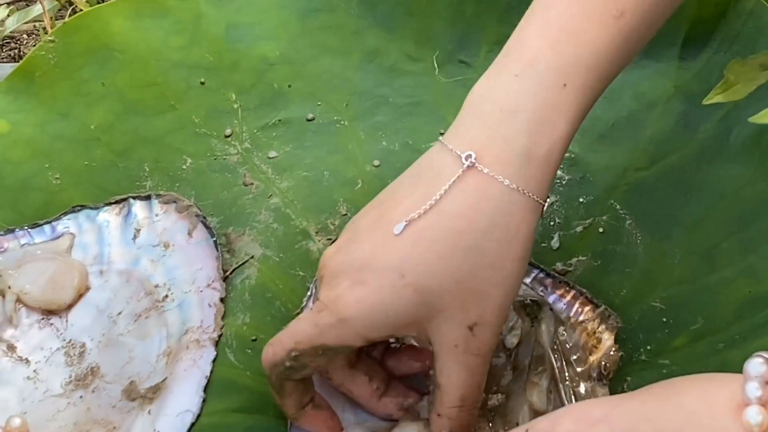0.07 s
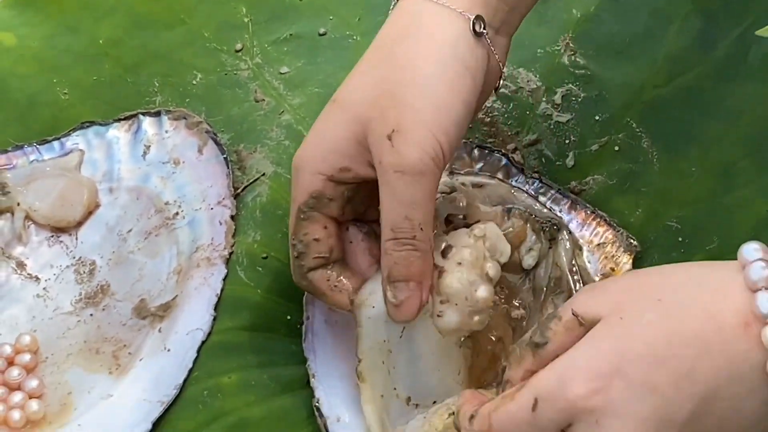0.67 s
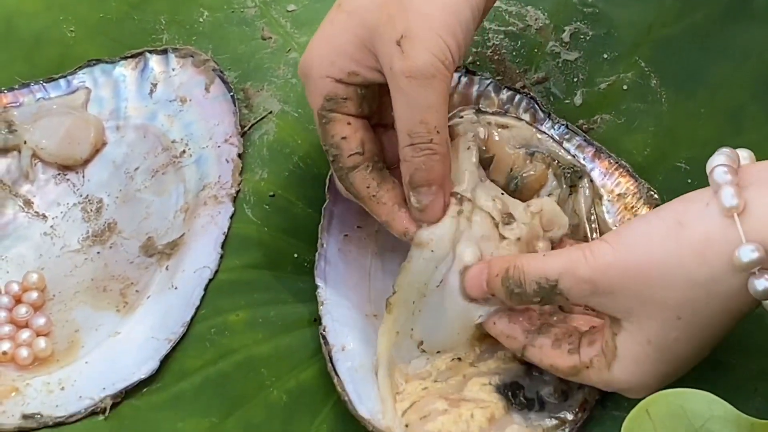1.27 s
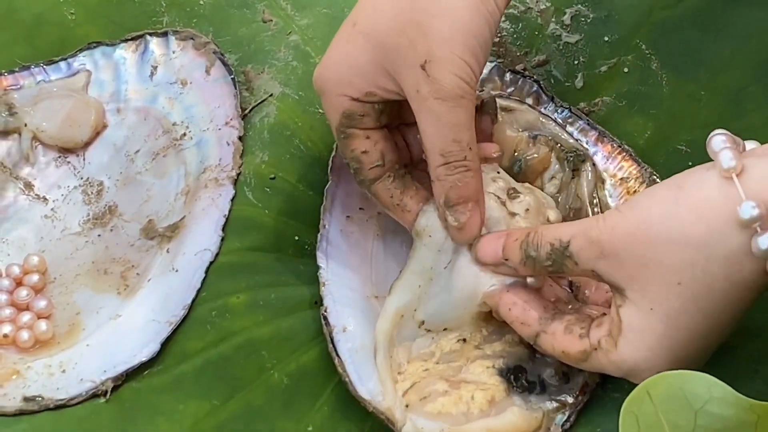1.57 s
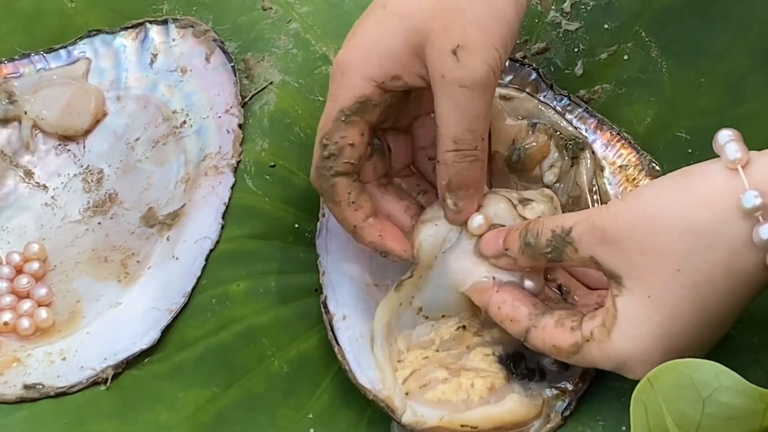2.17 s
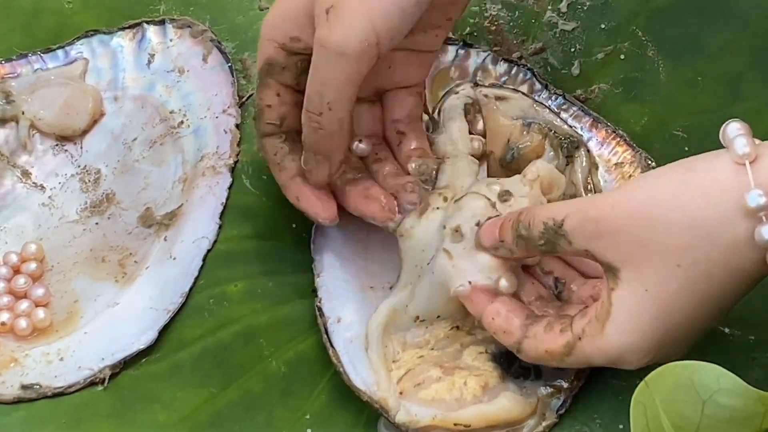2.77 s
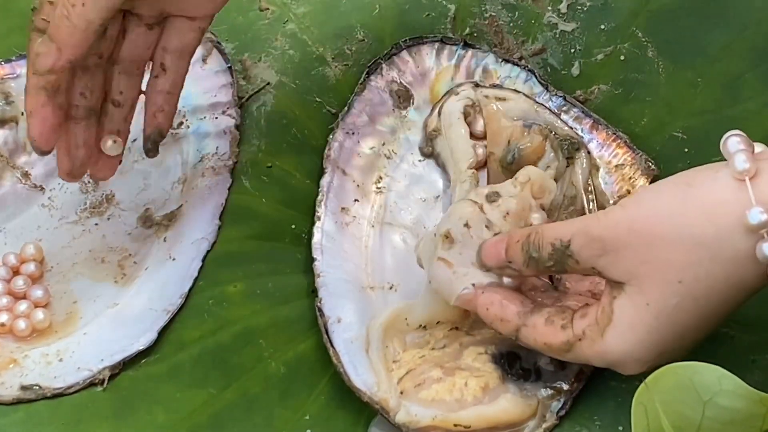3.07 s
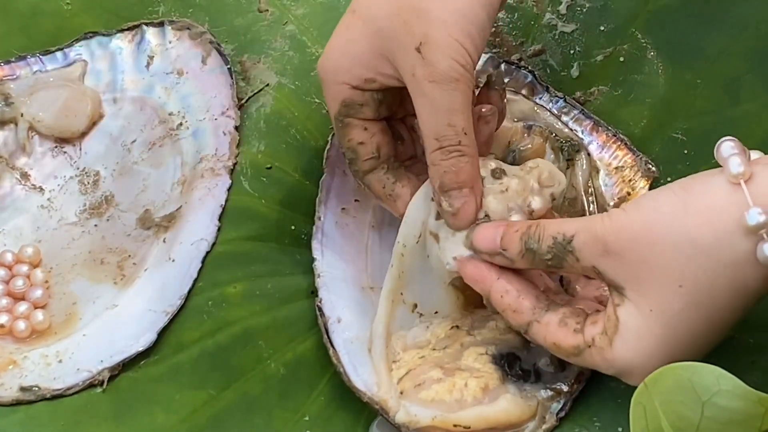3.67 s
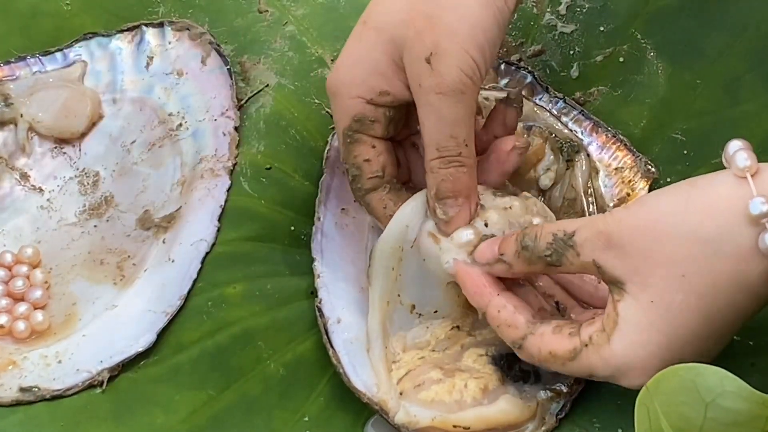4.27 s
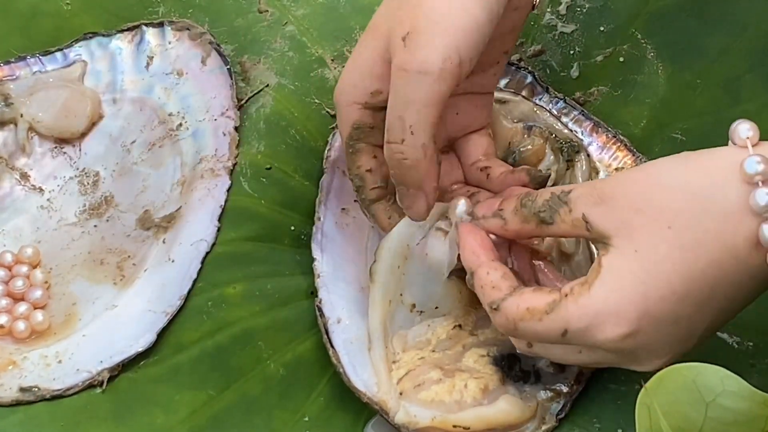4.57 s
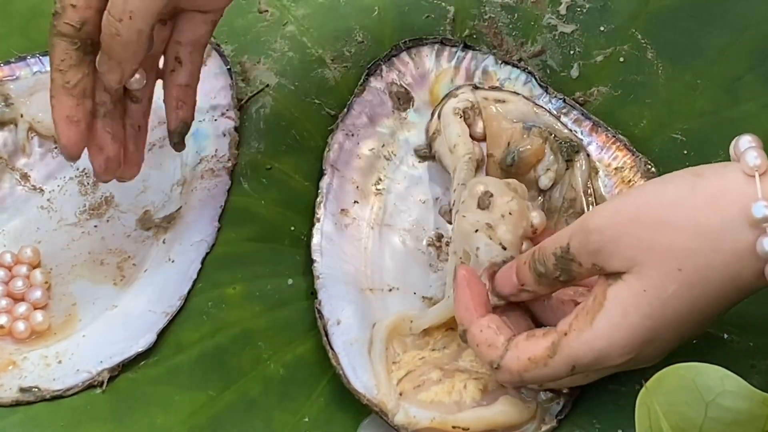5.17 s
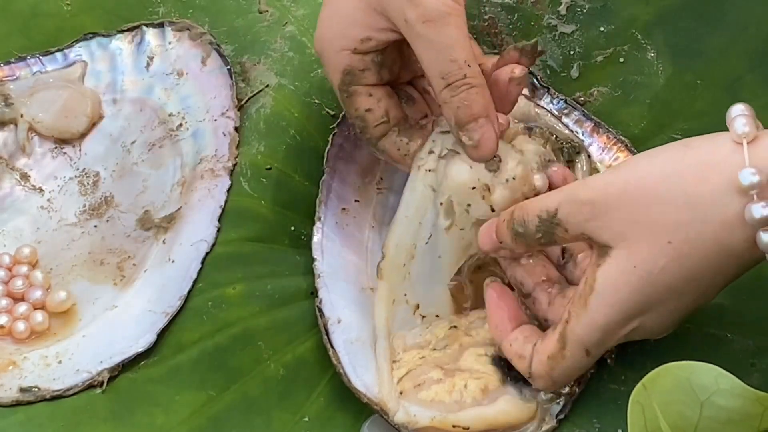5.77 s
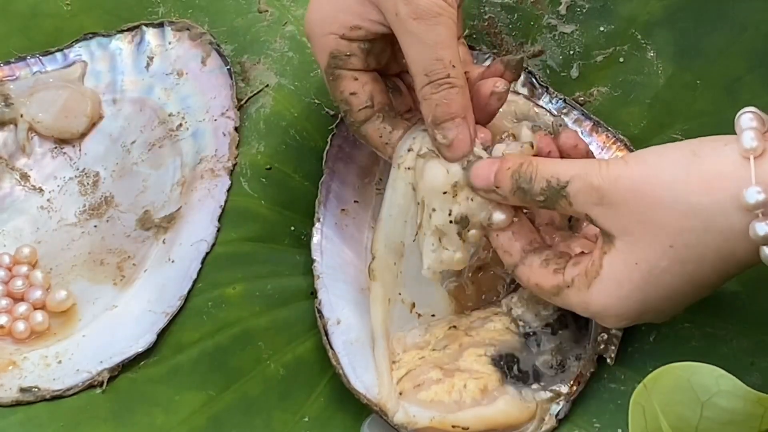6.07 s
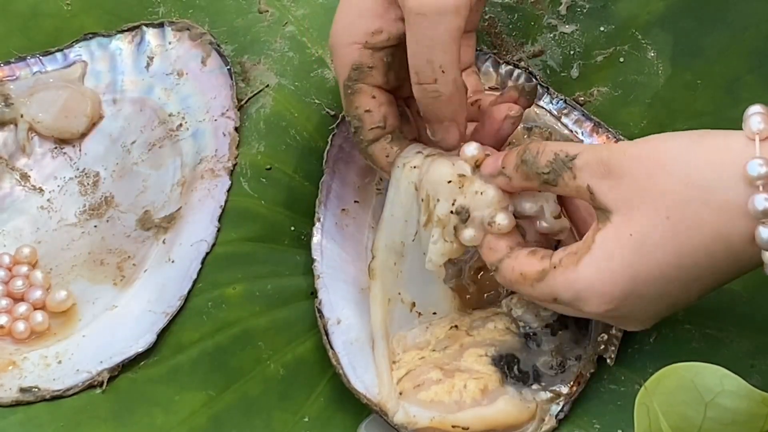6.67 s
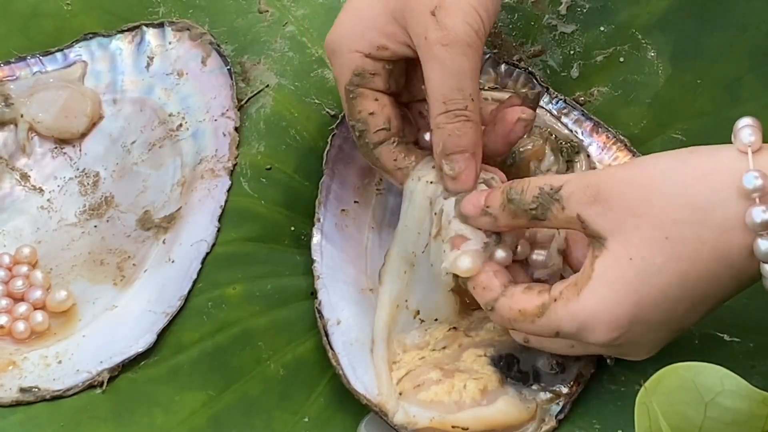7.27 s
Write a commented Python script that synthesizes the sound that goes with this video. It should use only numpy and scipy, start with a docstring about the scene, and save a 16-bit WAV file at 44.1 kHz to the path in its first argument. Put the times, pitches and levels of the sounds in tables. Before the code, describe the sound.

Pearls drop twice into a shell with bright, bouncing clicks, between soft wet squelches of mussel flesh and distant bird chirps.

```python
"""Pearls drop twice into an empty half shell close to a stereo microphone, bouncing and setting it ringing.
Wet fingers work them out of an opened mussel: the flesh squelches softly, films of water smack,
bubbles squirt through its folds and the mussel bumps on its leaf. The spot is outdoors: farther off,
small birds chirp in the trees and a cricket scrapes its wings, over a low rumble and faint airy noise."""
import sys
import numpy as np
from scipy import signal
from scipy.fft import rfft, irfft, next_fast_len
from scipy.io import wavfile
from scipy.ndimage import uniform_filter1d

SR = 44100
rng = np.random.default_rng(int(sys.argv[2]) if len(sys.argv) > 2 else 0)


def int16_out(signal):
    """Quantize to a 16-bit WAV file."""
    q = np.round(np.clip(np.atleast_2d(signal).T, -1, 1) * 32767)
    wavfile.write(sys.argv[1], SR, q.astype(np.int16))


N = 331191
TIME = np.arange(N) / SR

# Pearls landing and bouncing: t/s, place (0-1, first spot to second), knock/dB, ring/dB, tick/dB
PEARL_STRIKES = [(3.1623, 0.4, -28, -25, -15.5), (3.2223, 0.74, -37, -27, -23),
                 (3.2461, 0.8, -48.5, -36, -32), (3.249, 0.34, -41, -33, -34), (3.255, 0.44, -63, -47, -44),
                 (3.2583, 0.5, -49, -44, -39), (3.27, 0.6, -51, -45.5, -54),
                 (5.2914, 1, -30.5, -24.5, -14.5), (5.352, 1, -38.5, -35.5, -28.5),
                 (5.366, 0.7, -42.5, -36, -27), (5.3854, 0.7, -55, -46, -46),
                 (5.443, 0.7, -41.5, -30, -35.5), (5.46, 0.5, -47, -36.5, -38),
                 (5.4845, 0.5, -51.5, -39, -44), (5.527, 0.7, -61, -55.5, -65),
                 (5.5645, 0.7, -61, -64, -45.5)]
# Ranges of the knock, ring and tick: low f/Hz, high f/Hz
STRIKE_RANGES = [(260, 3500), (3600, 8200), (8200, 16500)]
# Modes of the empty shell: f/Hz, level/dB struck at the first spot, level/dB at the second, t60/s
SHELL_MODES = [(881.4, -1, -16, 0.016), (1200, 3, -2, 0.005), (1700, 3.5, 4, 0.0037),
               (2180, 5, 0.5, 0.0075), (2590, 1.5, 1, 0.0043), (3060, -5, -10.5, .011),
               (4140, -3.5, -5, 0.013), (4470, -11.5, -4.5, .012), (5130, 6.5, 0.5, 0.014),
               (5746, 2.5, 8.5, 0.007), (6220, 6, 10.5, 0.0082), (6520, 4, 3, 0.012), (6960, 7.5, -1, .01),
               (7460, 8.5, 0, 0.011), (8330, 9, 8, .004), (9800, 4.5, 13, 0.005),
               (10760, 4.5, 10.5, 0.0047), (11460, 13, 7.5, 0.0056), (12970, 14, 8.5, 0.0033),
               (13860, 14, 10, .005), (14750, 9, 6.5, 0.0056), (15760, -1.5, 2, .005)]
# Wet films snapping between fingers and flesh: t/s, air pocket f/Hz, pop/dB, snap/dB
FILM_SNAPS = [(0.0812, 3900, -38.5, -61), (0.186, 1240, -59, -62), (0.349, 2140, -57.5, -61),
              (0.4408, 2480, -44.5, -76), (0.708, 1350, -63, -64), (0.926, 11000, -60, -57),
              (1.211, 14800, -61, -77), (1.321, 11500, -70, -70), (1.385, 3340, -69, -76),
              (1.429, 4400, -60, -56), (1.44, 3020, -61.5, -60), (1.642, 1470, -64, -71),
              (1.788, 7130, -60, -69), (2.2106, 1880, -57, -66), (2.545, 6100, -63, -62),
              (2.275, 14500, -68, -72), (3.7491, 6400, -70, -67), (3.854, 8000, -66, -74.5),
              (4.363, 9000, -65, -67), (5.7117, 6070, -61.5, -60.5), (5.822, 10500, -70, -72),
              (6.0105, 14440, -60, -63.5), (6.2225, 11000, -68.5, -73.5), (6.505, 13700, -56.5, -63),
              (6.987, 6550, -58, -67)]
# Water squirting through the flesh: t/s, length/s, middle f/Hz, fall/octaves, level/dB
SQUIRTS = [(0.665, 0.052, 2050, 0.3, -61.5), (0.7, 0.042, 1850, 0, -60.5), (0.779, 0.014, 4470, 0, -58.5),
           (.845, 0.049, 2210, 0.3, -64.5), (0.933, 0.059, 1680, 0.44, -62), (1.004, 0.009, 1470, 0, -63),
           (1.035, 0.012, 1290, 0.064, -56), (1.108, 0.0081, 1340, 0, -56), (1.122, 0.045, 2000, 0.15, -60),
           (1.131, .04, 1480, 0.99, -63.5), (2.2067, .008, 1700, 0.33, -54.5)]
# Fingers pressing the flesh and sliding over it: t/s, length/s, level/dB
FINGER_PRESSES = [(0, 0.0061, -54.5), (.05, 0.23, -70.5), (.38, 0.087, -65.5), (.62, 0.031, -64.5),
                  (.685, 0.076, -72), (.85, 0.1, -71), (.935, 0.076, -65), (1.115, 0.04, -72),
                  (1.41, 0.31, -79), (2.215, 0.021, -68), (2.55, 0.019, -64.5), (2.88, 0.034, -67),
                  (3.29, 0.031, -66.5), (5.16, 0.083, -75), (5.49, 0.029, -62.5), (5.68, 0.071, -70.5),
                  (6.78, 0.058, -76)]
FINGER_SLIDES = [(0, 0.2, -67), (.3, 0.45, -81), (.72, 0.24, -69), (.92, 0.13, -67), (1.14, 0.18, -76.5),
                 (1.43, 0.025, -67), (1.63, 0.11, -76), (2.85, 0.25, -67), (3.27, 0.095, -69),
                 (5.04, 0.168, -76.5), (5.52, 0.54, -82.5), (6.0, 0.035, -72), (6.77, 0.08, -75)]
# The grip, never quite at rest but growing calmer: t/s, squelch/dB, rub/dB
GRIP_LEVELS = [(0, -67.5, -81), (1.2, -76, -81.5), (2.6, -78, -85), (3.8, -77.5, -85), (5.6, -75, -86),
               (6.1, -82, -85), (7.51, -78.5, -83)]
# Spectra of squelching flesh and sliding skin: f/Hz, density/dB
FLESH_SPECTRUM = [(400, -5.5), (700, 0), (1200, 0), (2000, 1), (2800, -6.5), (4000, -4), (7000, -17.5)]
SKIN_SPECTRUM = [(1000, -10.5), (2500, -3), (4500, -5), (6500, 2), (9000, 1), (12000, -6), (15500, 0)]
# Hands nudging the mussel: t/s, level/dB
NUDGES = [(0.632, -45), (0.7061, -36), (.722, -41), (2.55, -42.5), (2.576, -50), (2.904, -39.5),
          (2.92, -41)]
# Modes of the full mussel on its leaf: f/Hz, level/dB, t60/s
MUSSEL_MODES = [(165, 5, 0.054), (224, 1, 0.041), (376, -7, .03), (530, -15.5, 0.04), (800, -32, .02)]
# Phase between the two microphone ports for close sounds: f/Hz, lead of the left/rad
LEFT_PORT_LEAD = [(0, 0), (850, .3), (1400, .95), (2300, .2), (7000, -.2), (9000, -3.1), (13300, -9.4),
                  (17000, -14.5)]

# Bird call shapes: length/s, hoarseness (0-1), echo/dB, pitch ratios evenly spaced through the call
CHEEP = (.07, 0.12, -4, [1, 1, 1.01, 1.05, 1.09, 1.09, .97, .88, .56, .38])   # rises, then whips down
CHIRP = (.054, 0.3, -2, [.96, .97, .99, 1.02, 1.03, 1, .76])   # lifts a little, ends in a flick
CHIRP_UPPER = (.045, 0.4, -3, [1.22, 1.18, 1.16, 1.21, 1.22])   # the chirp's hoarse second voice
TWITTER = (.038, .45, -1, [.99, 1, 1.02, .96])   # a brief, hoarse arch
UPSLUR = (0.028, 0.4, -3, [.84, .99, 1.15])
DOWNSLUR = (0.055, 0.24, -4, [1.08, 1.02, .96, .86])
WHISTLE = (.078, 0.01, -8, [1.03, 1, 1, .995, .99, .97, .91, .83])   # held, drooping at the end
PEEP = (.055, .22, -3, [1.015, 1, .99])   # thin and level
# Calls of each shape from the trees: t/s, f/Hz, level/dB
CHEEP_CALLS = [(1.349, 4890, -64), (1.588, 4830, -58.5), (5.132, 4790, -62.5), (6.357, 4730, -62),
               (7.121, 4810, -58.5)]
CHIRP_CALLS = [(1.296, 4170, -62), (2.006, 4280, -62), (2.21, 3890, -66), (2.884, 4300, -60),
               (3.984, 4210, -65), (4.615, 3850, -71), (4.837, 4270, -61), (6.238, 4224, -62)]
TWITTER_CALLS = [(0, 5900, -56), (1.463, 4880, -64), (1.741, 5480, -72.5), (1.736, 4520, -71.5),
                 (1.894, 5150, -69), (2.58, 3950, -75.5), (2.695, 4740, -72), (3.405, 4750, -76),
                 (4.038, 5010, -67.5), (4.073, 5900, -72), (4.168, 5270, -69.5), (4.198, 5880, -71),
                 (4.277, 5500, -68.5), (4.339, 5600, -72.5), (4.45, 3940, -70), (4.496, 3360, -69.5),
                 (4.668, 3800, -73.5), (4.745, 4610, -73.5), (5.015, 5920, -69)]
UPSLUR_CALLS = [(2.373, 4350, -62), (3.517, 4050, -59.5), (4.153, 4300, -63.5), (4.328, 4280, -63.5)]
DOWNSLUR_CALLS = [(0.136, 4110, -62.5), (1.535, 3440, -75.5), (2.71, 3580, -76), (3.30, 2200, -81),
                  (5.752, 3150, -71), (6.172, 2620, -74.5), (6.275, 2500, -79.5), (6.425, 2700, -71),
                  (6.775, 2170, -76), (6.945, 2555, -75.5), (7.045, 2950, -71.5), (7.185, 2475, -71.5)]
WHISTLE_CALLS = [(2.278, 2510, -74), (3.051, 3000, -66.5), (3.38, 3110, -74.5), (4.535, 2810, -77),
                 (5.948, 2826, -67), (6.235, 2990, -67.5), (6.594, 2980, -65), (7.365, 2966, -71)]
PEEP_CALLS = [(0.1, 2920, -63), (.18, 2900, -64), (0.285, 4020, -64.5), (0.728, 4690, -63),
              (1.48, 1745, -70), (4.84, 1770, -73), (5.16, 1697, -69), (5.803, 2750, -69.5),
              (6.08, 2550, -72.5), (6.485, 2030, -72.5), (7.225, 2750, -76)]
# Bouts of the distant cricket: t/s, phrases, phrase period/s, wing strokes per phrase, level/dB
CRICKET_BOUTS = [(.049, 8, 0.152, 3, -68.5), (1.272, 7, 0.16, 3, -67.5), (2.328, 1, 0, 39, -68.5),
                 (3.636, 5, 0.19, 3, -72), (4.687, 6, .173, 3, -70.5), (5.807, 4, .169, 3, -70.5),
                 (6.575, 6, 0.157, 3, -72.5)]
# Swell of the outdoor rumble: t/s, level/dB
RUMBLE_LEVELS = [(0, -39.5), (.3, -39), (1.42, -39), (1.58, -44), (2.2, -40), (2.95, -38), (3.9, -42),
                 (4.3, -40.5), (5.15, -42), (5.45, -47), (6.2, -42.5), (7.51, -41.5)]
# Spectra of the rumble and the open air: f/Hz, density/dB
RUMBLE_SPECTRUM = [(25, -16.5), (40, -11.5), (58, 11), (80, -1.5), (120, -6.5), (170, -19), (250, -33.5),
                   (400, -43.5), (1000, -69)]
AIR_SPECTRUM = [(200, 10), (400, 7.5), (700, 8.5), (1300, -0.5), (3000, -7), (7000, -13.5), (11500, -48),
                (14000, -33)]
# How alike noise is on the microphone's left and right: f/Hz, likeness (0-1)
STEREO_LIKENESS = [(60, 1), (130, 0.94), (300, 0.4), (700, 0.29), (1300, 0.31), (2500, 1), (7000, 1),
                   (15000, 1)]


def pearls(crack_db=3, crack_t60=.003, uneven_db=1.5, detune=.006, ground_delay_s=.0026, level_db=-1):
    """Close up, each hard contact cracks and rings the shell's modes according to where it lands."""
    out, t = np.zeros(N), seconds(.054)
    hz, first_db, second_db, t60 = np.transpose(SHELL_MODES)[:, :, None]
    signs = (-1) ** np.arange(len(hz))[:, None]   # neighbouring modes swing against each other
    for s, place, *levels_db in PEARL_STRIKES:
        mode_db = first_db + place * (second_db - first_db) + uneven_db * rng.standard_normal(hz.shape)
        struck_hz = hz * (1 + detune * rng.standard_normal(hz.shape))
        modes = signs * from_db(mode_db) * np.sin(2 * np.pi * struck_hz * t) * dying(t, t60)
        burst = rng.standard_normal(len(t)) * dying(t, crack_t60)
        crack = band(burst, 900, 14260, order=1)   # so small a contact radiates little bass
        contact = modes.sum(axis=0) + from_db(crack_db) * crack
        hit = sum(from_db(db) * unit_attack(band(contact, low, high, order=4))
                  for (low, high), db in zip(STRIKE_RANGES, levels_db))
        add(out, s, hit)
        add(out, s + ground_delay_s, from_db(-13.5) * hit)   # reflection off the ground
    return with_echo(from_db(level_db) * out, t60=.13, wet_db=-23.5, spread=.36)


def smacks(snap_t60=.012, pop_t60=.0056, pop_rise_s=.00028):
    """A wet film tears with a snap, and the small air pocket behind it rings briefly."""
    out, t = np.zeros(N), seconds(.04)
    for s, pocket_hz, pop_db, snap_db in FILM_SNAPS:
        pop = np.sin(2 * np.pi * pocket_hz * t) * dying(t, pop_t60) * (1 - np.exp(-t / pop_rise_s))
        snap = band(rng.standard_normal(len(t)) * dying(t, snap_t60), 760, 8400, order=1)
        add(out, s, from_db(pop_db) * unit_attack(pop) + from_db(snap_db) * unit_attack(snap))
    return with_echo(out, t60=.12, wet_db=-11, spread=.041)


def squirts(bubbles_per_s=1100, ring_cycles=8.2, spread_octaves=.11, size_spread_db=5, level_db=1.5):
    """Water squirts as a froth of tiny ringing bubbles; their pitch falls where a fold opens."""
    out, t = np.zeros(N), seconds(.02)
    for s, length, middle_hz, fall, db in SQUIRTS:
        froth, count = np.zeros(N), round(length * bubbles_per_s)
        for when, (pitch, size) in zip(rng.random(128)[:count], rng.standard_normal((128, 2))):
            hz = middle_hz * 2 ** (spread_octaves * np.clip(pitch, -2, 2) + fall * (.5 - when))
            bubble = np.sin(2 * np.pi * hz * t) * dying(t, ring_cycles / hz)
            add(froth, s + when * length, from_db(size_spread_db * size) * bubble)
        out += from_db(db + level_db) * froth * np.sqrt(length * SR) / np.linalg.norm(froth)
    return with_echo(out, t60=.27, wet_db=-8, spread=.067)


def fingers(squelch_db=1, rub_db=3):
    """Pressed flesh squelches in tiny bursts; sliding wet skin gives a grainy hiss and fine crackles."""
    s, grip_squelch_db, grip_rub_db = np.transpose(GRIP_LEVELS)
    squelch = banded_noise(FLESH_SPECTRUM, patchy_db=2.5) * rms_one(flicker(280, 3.5))
    rub = banded_noise(SKIN_SPECTRUM, patchy_db=3.5) * rms_one(flicker(500, 2.5))
    rub += from_db(-5) * crackles()
    pressing = touches(FINGER_PRESSES, np.interp(TIME, s, grip_squelch_db))
    sliding = touches(FINGER_SLIDES, np.interp(TIME, s, grip_rub_db))
    return from_db(squelch_db) * pressing * squelch + from_db(rub_db) * sliding * rub


def touches(moves, grip_db, attack_s=.013, release_s=.021):
    """Gain of finger movements: each swells, holds and dies away, over the unsteady grip."""
    power = (from_db(grip_db) * flicker(4.9, 2.2)) ** 2
    for s, length, db in moves:
        swell = np.clip((TIME - s) / attack_s + .5, 0, 1)
        fade = np.exp(-np.maximum(TIME - s - length, 0) / release_s)
        power += (from_db(db) * swell * fade) ** 2
    return np.sqrt(power)


def crackles(tears_per_s=130, spread_db=4.5):
    """Tiny films tear under a sliding finger in bright clicks of uneven size; rms 1."""
    tears = rng.random(N) < tears_per_s / SR
    sizes = from_db(spread_db * np.minimum(rng.exponential(1, N), 3)) * rng.choice([-1, 1], N)
    return rms_one(band(tears * sizes + 1e-18, 4500, 15000, order=1))


def bumps(level_db=-3, uneven_db=2):
    """The mussel is nudged on its leaf: a dull, short thump in its few damped modes."""
    out, t = np.zeros(N), seconds(.12)
    hz, mode_db, t60 = np.transpose(MUSSEL_MODES)[:, :, None]
    for s, db in NUDGES:
        strength = from_db(db + level_db + mode_db + uneven_db * rng.standard_normal(hz.shape))
        add(out, s, np.sum(strength * np.sin(2 * np.pi * hz * t) * dying(t, t60), axis=0))
    return out


def birds(level_db=-.5, upper_lead_s=.006, upper_db=-6):
    """Small birds repeat seven kinds of call off in the echoing trees; chirps have two voices."""
    direct, into_trees = np.zeros((2, N))
    upper_calls = [(s - upper_lead_s, hz, db + upper_db) for s, hz, db in CHIRP_CALLS]
    voices = [(CHEEP, CHEEP_CALLS), (CHIRP, CHIRP_CALLS), (CHIRP_UPPER, upper_calls),
              (TWITTER, TWITTER_CALLS), (UPSLUR, UPSLUR_CALLS), (DOWNSLUR, DOWNSLUR_CALLS),
              (WHISTLE, WHISTLE_CALLS), (PEEP, PEEP_CALLS)]
    for (length, hoarse, echo_db, ratios), calls in voices:
        for s, pitch_hz, db in calls:
            note = from_db(db + level_db) * bird_note(length, hoarse, ratios, pitch_hz)
            add(direct, s, note)
            add(into_trees, s, from_db(echo_db) * note)
    return direct + echo(into_trees, t60=.28, spread=.076)


def bird_note(length, hoarse, ratios, pitch_hz, flutter_hz=700, quaver_hz=330, fading_db=3.5):
    """A note glides along its shape, never twice alike; hoarseness makes it flutter and quaver."""
    longer, deeper = rng.uniform(-1, 1, 2)
    t = seconds(length * (1 + .04 * longer))
    along = t / t[-1]
    glide = pitch_hz * np.interp(along, np.linspace(0, 1, len(ratios)), ratios) ** (1 + .1 * deeper)
    drop = np.maximum(1 - glide / pitch_hz, 0)
    unsteadiness = hoarse + .1 + 1.6 * drop   # the voice breaks as it drops
    quaver = quaver_hz * unsteadiness * wander(len(t), size=50)
    phase = 2 * np.pi * np.cumsum(glide + quaver) / SR
    flutter = 1 + hoarse * (np.sin(2 * np.pi * flutter_hz * t) + wander(len(t), size=40))
    swell = np.sqrt(np.abs(np.sin(np.pi * along)))
    fading = from_db(fading_db * wander(len(t), size=200))   # paths through the foliage interfere
    return rms_one(swell * fading * flutter * np.sin(phase))


def cricket(start_hz=7373, spread_hz=25, sag_hz=200, rasp_hz=45, stroke_period_s=.027, uneven_db=2.5):
    """In the distance, each wing stroke is a short, rasping tone that sags as the scraper slows."""
    out, t = np.zeros(N), seconds(.025)
    along = t / t[-1]
    for start, phrases, period, strokes, db in CRICKET_BOUTS:
        for phrase, k in np.ndindex(phrases, strokes):
            late, loud, sharp = rng.standard_normal(3)
            hz = start_hz + spread_hz * sharp - sag_hz * along ** 2 + rasp_hz * wander(len(t), size=50)
            stroke = rms_one(np.sin(np.pi * along) * np.sin(2 * np.pi * np.cumsum(hz) / SR))
            onset = start + phrase * period + k * stroke_period_s + .0011 * late
            add(out, onset, from_db(db + uneven_db * loud) * stroke)
    return with_echo(out, t60=.4, wet_db=-6, spread=.2)


def outdoor_ambience(air_db=-69.5):
    """Behind everything, a low rumble swells and sinks under the faint noise of the open air."""
    swell = from_db(np.interp(TIME, *np.transpose(RUMBLE_LEVELS))) * flicker(7.7, .82)
    rumble = swell * banded_noise(RUMBLE_SPECTRUM, patchy_db=2)
    return rumble + from_db(air_db) * banded_noise(AIR_SPECTRUM, patchy_db=3)


def echo(x, t60, spread):
    """Leaves and ground send back a diffuse, dying tail; `spread` sets its stereo width."""
    t = seconds(.5)
    mid, side = rng.standard_normal((2, len(t))) * dying(t, t60) * (t > .003)
    tails = (mid + spread * side * [[1], [-1]]) / np.linalg.norm(mid)
    return signal.fftconvolve(x[None], tails, axes=1)[:, :N]


def with_echo(x, t60, wet_db, spread):
    """The direct sound together with its echo, in stereo."""
    return x + from_db(wet_db) * echo(x, t60, spread)


def microphone_ports(near):
    """Close treble reaches the microphone's left port later than the right."""
    left, right = near
    size = next_fast_len(N + 1024)
    lead = np.interp(np.arange(size // 2 + 1) * SR / size, *np.transpose(LEFT_PORT_LEAD))
    return np.array([irfft(rfft(left, size) * np.exp(1j * lead), size)[:N], right])


def banded_noise(spectrum, patchy_db):
    """Half-octave bands of stereo noise, each with its own flicker and left-right likeness; rms 1."""
    mids, sides = np.zeros((2, N))
    edges = 22 * 2 ** np.arange(0, 10, .5)
    white = rng.standard_normal((2, 2, N))
    for k, (low, high) in enumerate(zip(edges, edges[1:])):
        hz = np.sqrt(low * high)
        if spectrum[0][0] / 2 < hz < spectrum[-1][0] * 2:
            gain = from_db(at_hz(spectrum, hz)) * flicker(25, patchy_db)
            mid, side = gain * band(white[k % 2], low, high)
            alike = at_hz(STEREO_LIKENESS, hz)
            mids += np.sqrt(1 + alike) * mid
            sides += np.sqrt(1 - alike) * side
    return rms_one(np.array([mids + sides, mids - sides]))


def flicker(rate, spread_db):
    """A gain that wanders about 1, with `rate` turns a second."""
    turns = np.arange(int(rate * TIME[-1]) + 2)
    return np.interp(TIME * rate, turns, from_db(spread_db * rng.standard_normal(len(turns))))


def wander(count, size):
    """A short random curve of spread about 1, smoothed over `size` samples."""
    return rms_one(uniform_filter1d(rng.standard_normal(8192), size=size))[:count]


def from_db(db):
    """Decibels to gain."""
    return 10 ** (np.asarray(db) / 20)


def rms_one(x):
    """Scale to rms 1."""
    return x / np.sqrt(np.mean(x ** 2) + 1e-20)


def unit_attack(x):
    """Scale a hit so that its first 5 ms have rms 1."""
    return x / np.std(x[:int(.005 * SR)])


def seconds(length):
    """Time axis of a short sound."""
    return np.arange(int(length * SR)) / SR


def dying(t, t60):
    """Exponential decay, 60 dB down after t60."""
    return np.exp(-np.log(1000) * t / t60)


def at_hz(points, hz):
    """Read a curve on a log-frequency axis."""
    points_hz, values = np.transpose(points)
    return np.interp(np.log(hz), np.log(points_hz), values)


def band(x, low_hz, high_hz, order=2):
    """Causal band-pass."""
    sos = signal.butter(order, [low_hz, min(high_hz, .45 * SR)], "band", fs=SR, output="sos")
    return signal.sosfilt(sos, x)


def add(track, s, sound):
    """Mix a sound into a track at time s."""
    start = max(round(s * SR), 0)
    part = sound[:max(N - start, 0)]
    track[start:start + len(part)] += part


def scene():
    """Pearls and mussel close to the microphone, with birds, cricket and ambience beyond."""
    near = microphone_ports(pearls() + smacks() + squirts() + fingers() + bumps())
    return near + birds() + cricket() + outdoor_ambience()


def record(dry):
    """The recorder clips any peak over full scale and cuts the treble above 16.4 kHz."""
    low_pass = signal.ellip(10, .1, 80, 16400, fs=SR, output="sos")
    return signal.sosfilt(low_pass, np.clip(dry, -1, 1))


dry = scene()
out = record(dry)
int16_out(out)
```